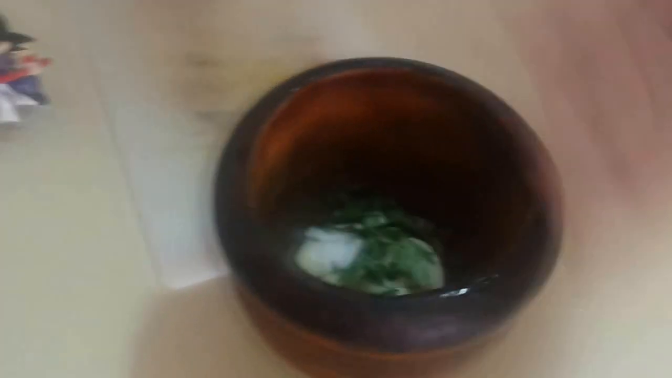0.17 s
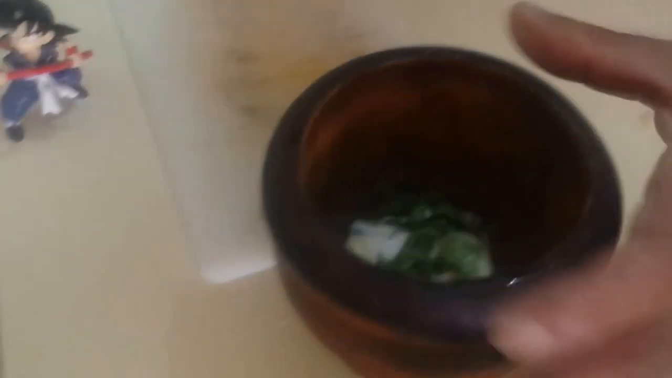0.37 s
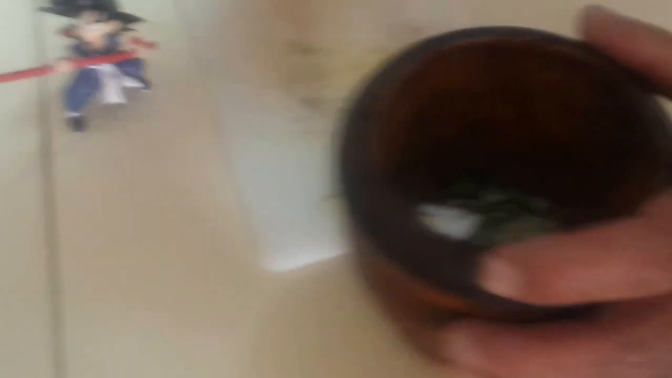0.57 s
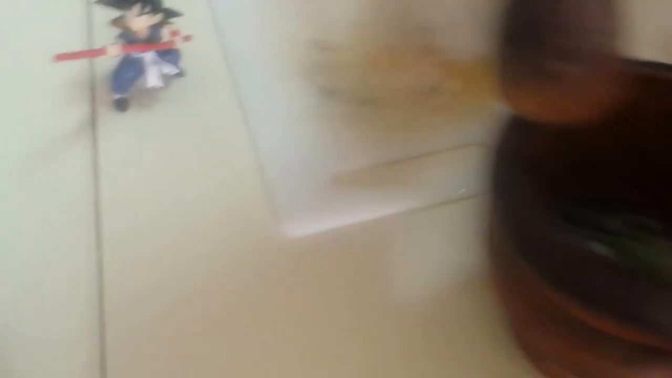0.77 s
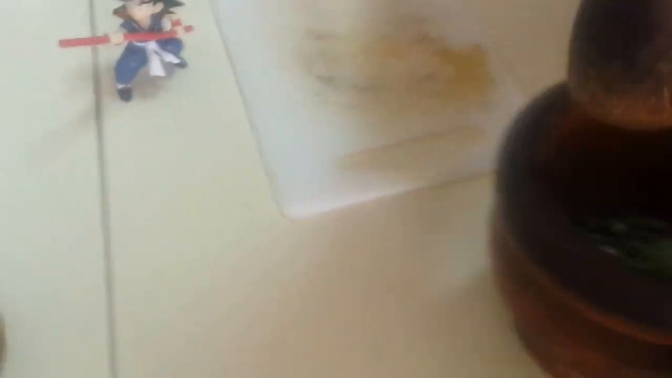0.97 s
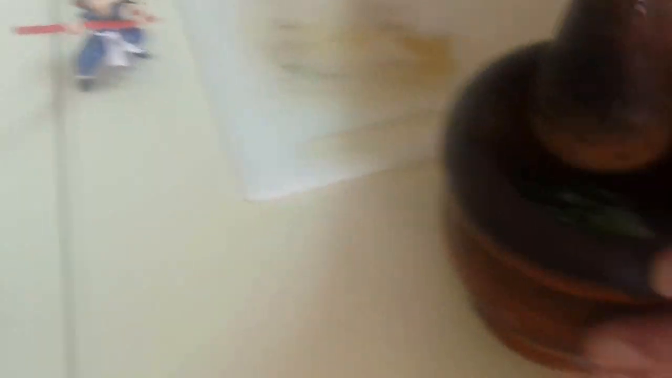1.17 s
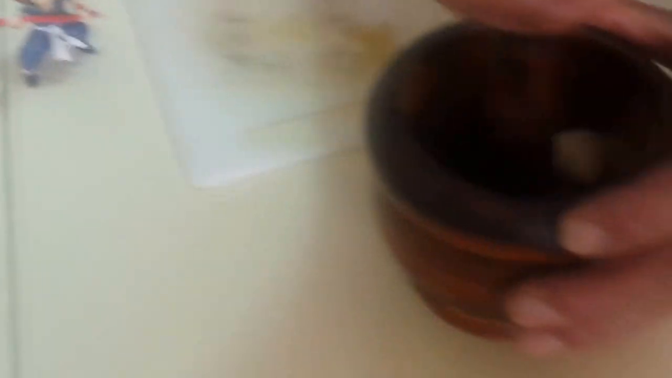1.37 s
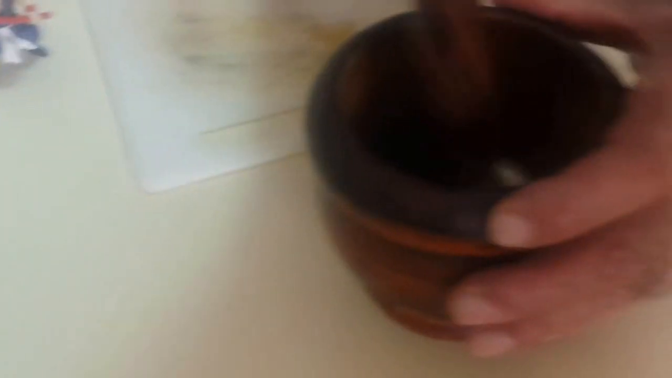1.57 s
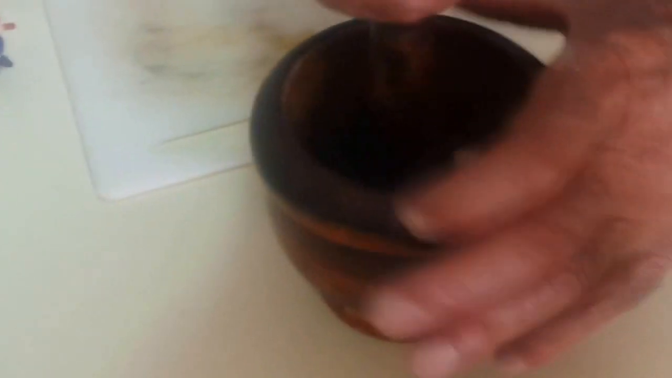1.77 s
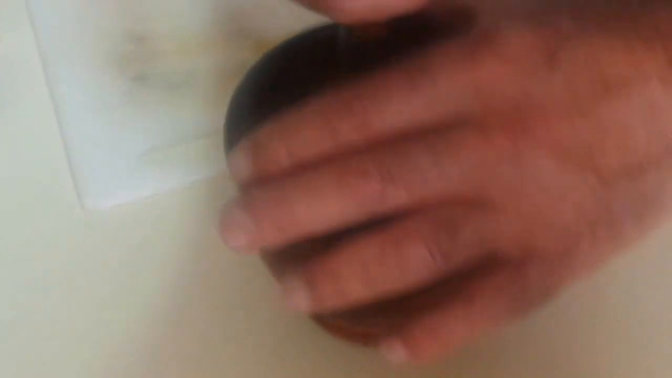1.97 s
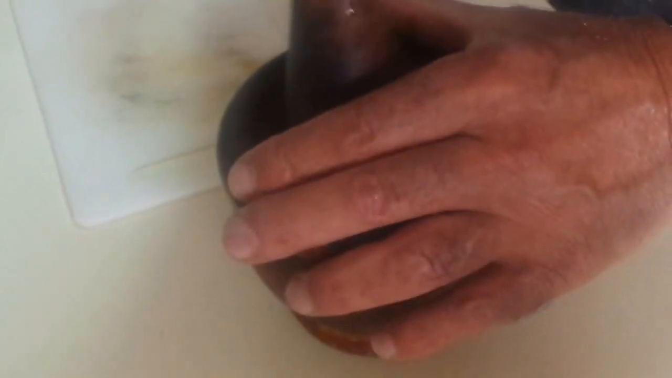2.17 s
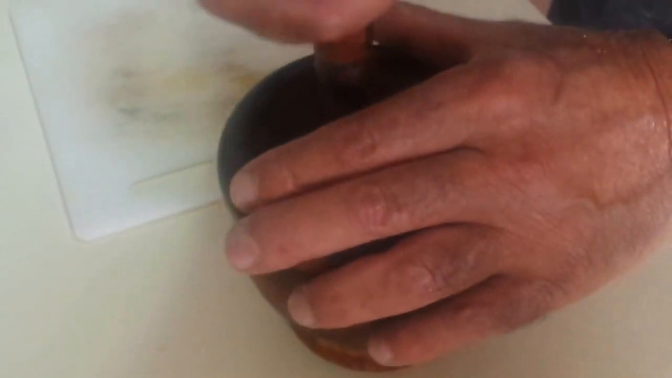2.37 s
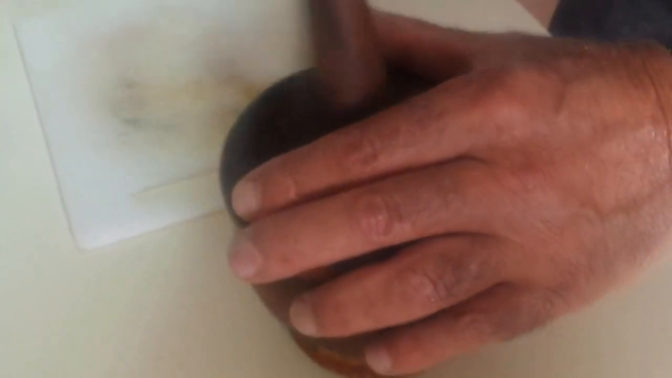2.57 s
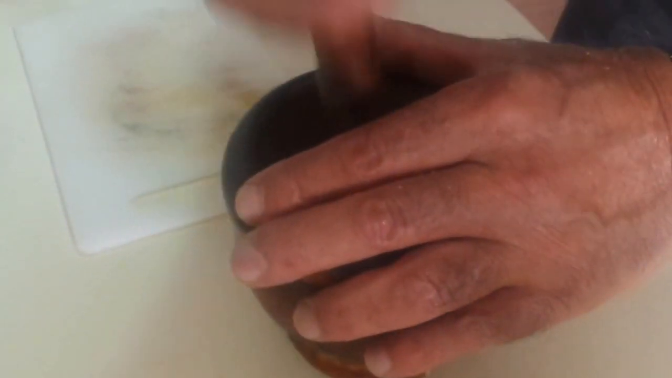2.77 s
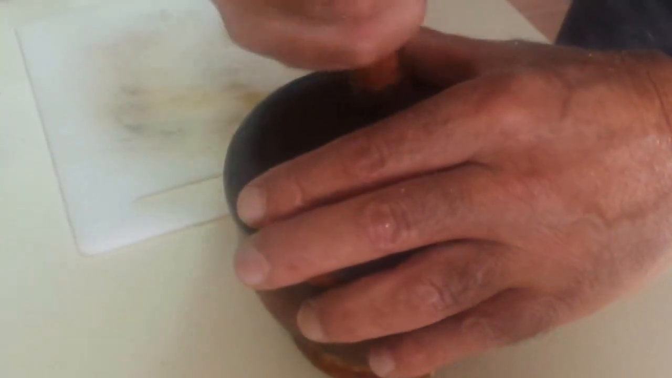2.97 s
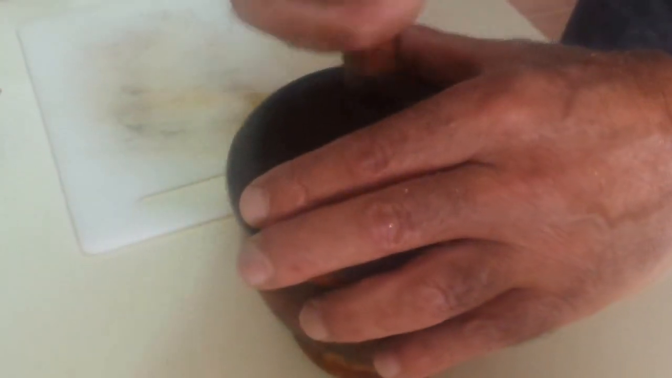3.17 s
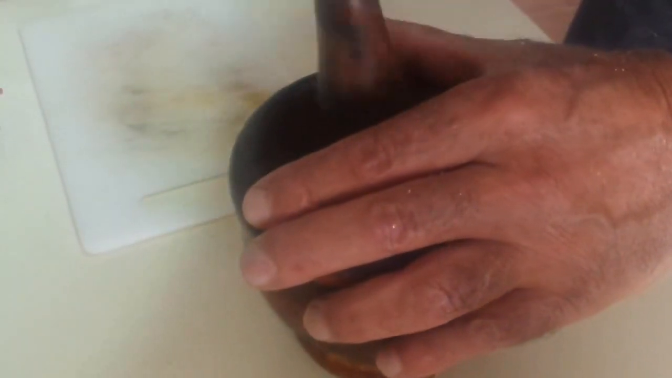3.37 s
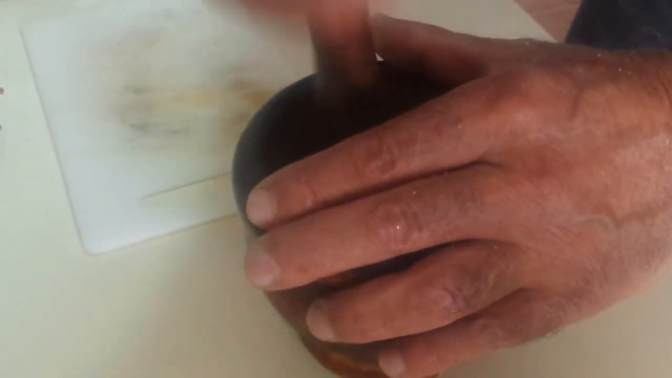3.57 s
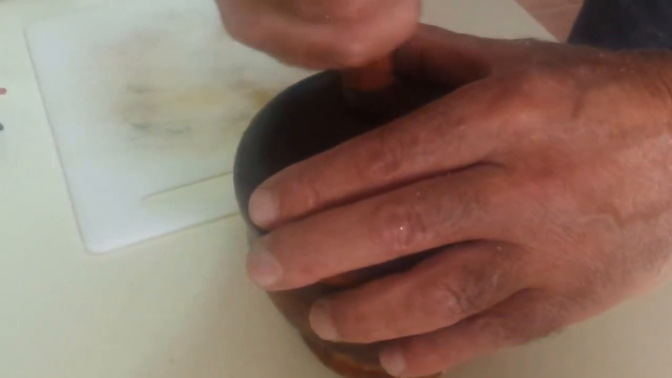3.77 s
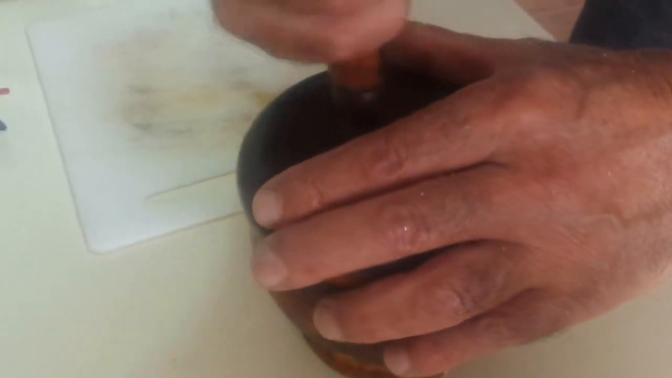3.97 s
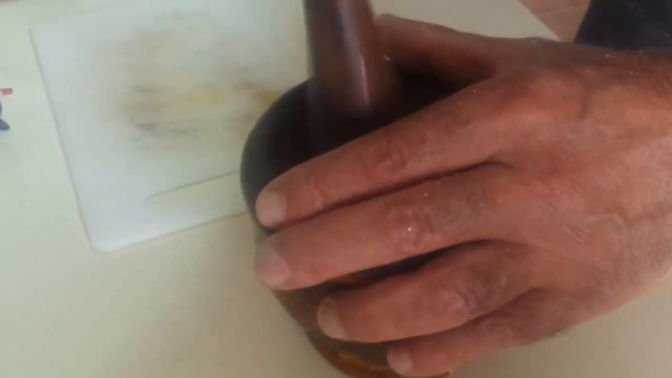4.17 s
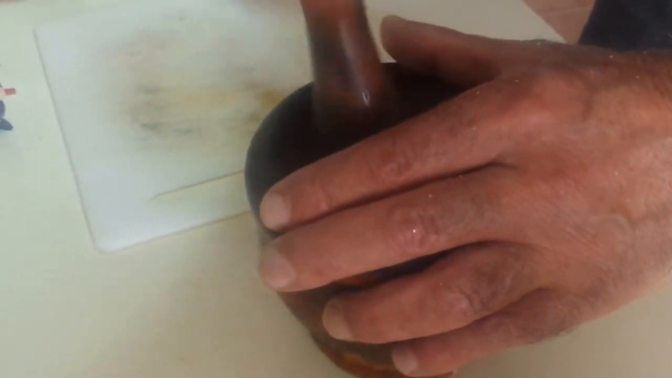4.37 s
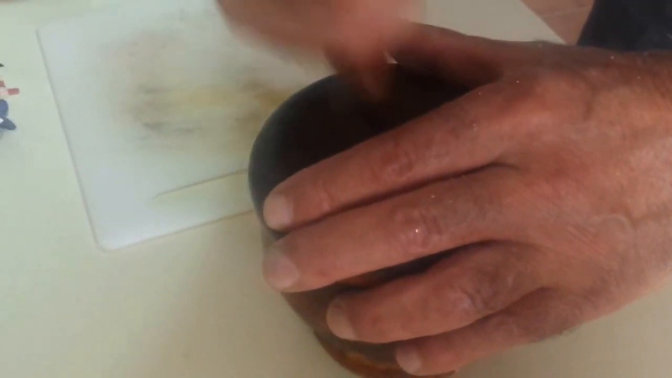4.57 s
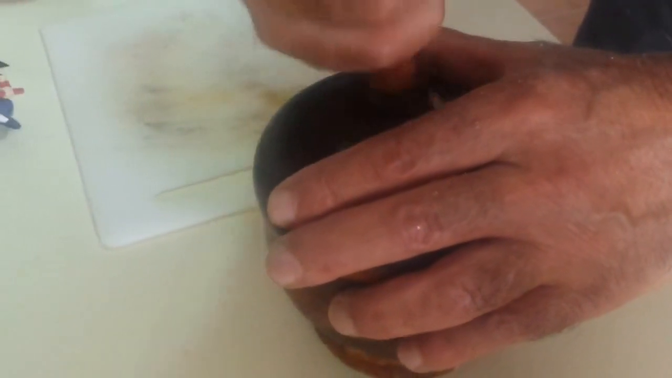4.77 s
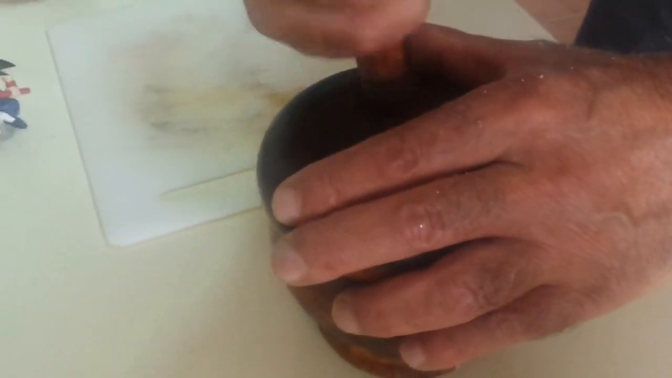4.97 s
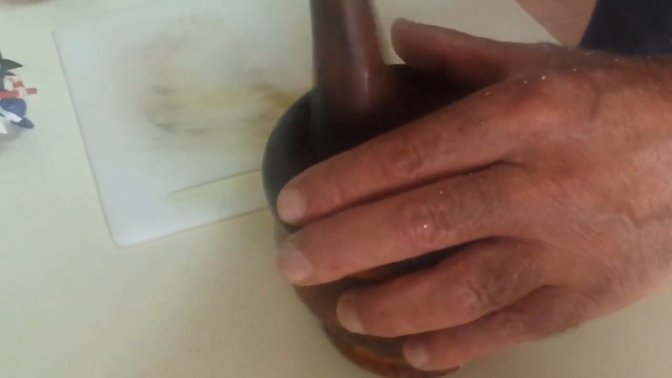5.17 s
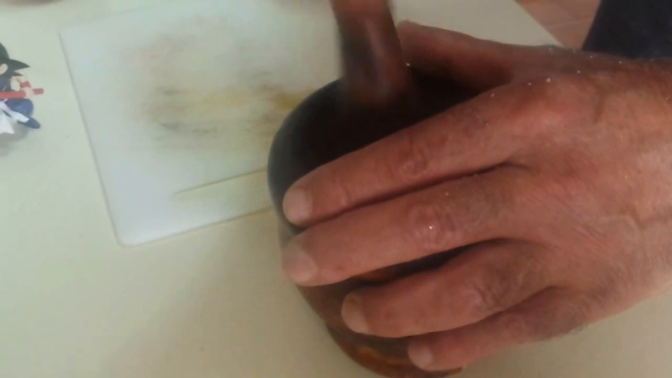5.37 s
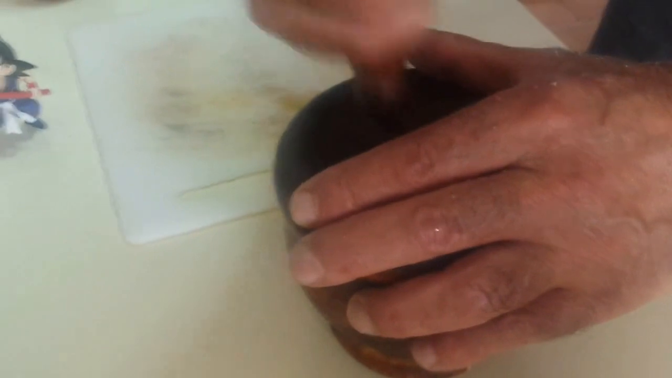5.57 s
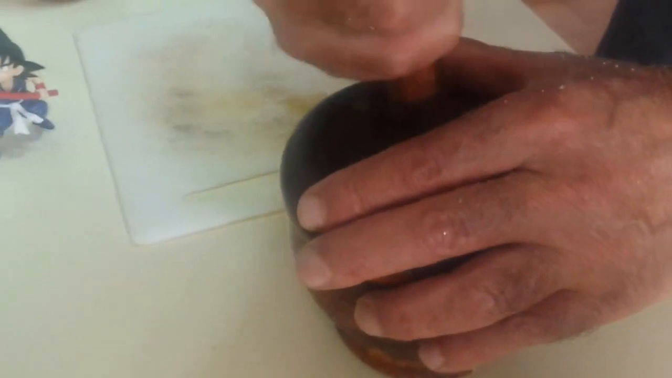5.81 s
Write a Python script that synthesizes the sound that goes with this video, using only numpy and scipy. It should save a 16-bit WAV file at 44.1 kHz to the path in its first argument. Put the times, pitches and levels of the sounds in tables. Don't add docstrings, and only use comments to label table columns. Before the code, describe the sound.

Close to a phone microphone in a hard, lively kitchen, a wooden pestle bumps, then gives one sharp bare knock. After a pause with skin brushing the table, a bright rim strike starts steady pounding, about four blows a second, with dull woody thuds, wet garlic crunches, booming table and faint jar rattle. Soft hum lies underneath.

```python
import sys
import numpy as np
from scipy import signal
from scipy.fft import rfft, irfft
from scipy.io import wavfile
from scipy.ndimage import uniform_filter1d

SR = 44100
rng = np.random.default_rng(int(sys.argv[2]) if len(sys.argv) > 2 else 0)


def pcm_store(signal):
    levels = np.round(np.clip(np.atleast_2d(signal), -1, 1) * 32767)
    wavfile.write(sys.argv[1], SR, levels.astype(np.int16).T)


def elevation(decibels):
    levels = np.asarray(decibels, float)
    return 10 ** (levels / 20)


N = 257544

# (time [s], force [dB], crunch [dB], table boom [dB], squish [dB])
LANDINGS = [(0.0136, -10.5, -26.5, -18.5, -42), (0.1235, -12.5, -31, -25.5, -20),
            (1.25, -26.5, -32, -27, -30), (1.679, -17, -23, -15, -23), (2.249, -16, -22, -13.5, -16.5),
            (2.58, -14.5, -15, -22.5, -17), (2.862, -19.5, -24.5, -20.5, -10.5),
            (3.13, -20, -24, -22, -13.5), (3.398, -24, -25, -16.5, -21), (3.672, -14, -18.5, -10.5, -15),
            (3.927, -12.5, -16.5, -15, -20), (4.183, -13, -21, -10, -18), (4.424, -26, -21, -13, -28),
            (4.679, -15.5, -22, -11.5, -19), (4.93, -26.5, -29, -33.5, -15), (5.451, -12.5, -27, -19, -28),
            (5.705, -11.5, -25.5, -14, -36)]
# (time [s], force [dB], crunch [dB])
DRIVES = [(1.264, -23, -49), (1.327, -29, -35), (1.694, -6, -20.5), (2.296, -18, -55), (2.596, -3.5, -50),
          (2.629, -19, -77), (2.878, -15, -30.5), (3.176, -18.5, -67), (3.415, -9.5, -26),
          (3.719, -6.5, -20), (3.945, -4, -26), (4.202, -5, -24.5), (4.442, -6.5, -24.5),
          (4.695, -7.5, -52)]
# (time [s], force [dB], crunch [dB], rim click over force [dB], push into table [dB])
KNOCKS = [
    (0.7, -8, -26, -3, -26),
    (2.025, -9, -34.5, 4.5, -29),
    (5.178, -20, -16.5, -10, -19.5),
    (5.436, -5.5, -20.5, -43, -33),
    (5.682, -14.5, -17.5, -7, -38),
]
# (frequency [Hz], level [dB])
PASTE_COLOUR = [(150, -19.5), (350, 3.5), (700, 4.5), (1300, -2), (2000, -1.5), (2800, 1.5), (3400, -4),
                (6000, -20.5), (16000, -60.5)]
# (frequency [Hz], level [dB])
BOWL_COLOUR = [(100, -22.5), (300, -0.5), (600, 0.5), (860, 5.5), (1150, -5), (1700, -12), (2500, -7),
               (5000, -24.5), (16000, -139)]
# (frequency [Hz], level [dB])
RIM_COLOUR = [(900, -29.5), (1800, -7), (2300, 9.5), (2900, 11.5), (3700, 3.5), (5000, -11), (8000, -16),
              (16000, -56)]
# (frequency [Hz], level [dB])
GRIT_COLOUR = [(1200, -9.5), (2500, 13), (3600, 13.5), (5000, 9.5), (6500, 4), (9000, -3.5), (12000, -9),
               (16000, -14)]
# (frequency [Hz], level [dB], t60 [s])
TABLE_MODES = [(110.7, -6.5, 0.36), (147, 2.5, 0.23), (155.7, 4.5, 0.44), (190, -23, 1)]
# (frequency [Hz], level [dB], t60 [s])
CUPBOARD_MODES = [(253, -11.5, 0.88), (283.5, -6, 1.3), (322, -6.5, 1.01), (466, -10.5, 0.55),
                  (510, -47, 0.26), (329.4, -7, 1.6)]
# (frequency [Hz], level [dB], t60 [s])
GLASS_MODES = [(3281, -1, .6), (3268, -10, .6), (8215, -12, .28), (10900, -21, .2), (14300, -27, .15)]
# (frequency [Hz], level [dB], t60 [s])
PLATE_MODES = [(2336, -1, .42), (2347, -10, .42), (9173, -30, .3)]
# (frequency [Hz], level [dB], t60 [s])
JAR_MODES = [(2638, -4, .45), (3817, -4, .45), (4064, -9, .4), (4791, -10, .4), (6165, -4, .33),
             (6190, -6, .33)]
# (time [s], level [dB])
GLASS_HITS = [(.015, -17)]
# (time [s], level [dB])
PLATE_HITS = [(.19, -19)]
# (time [s], level [dB])
JAR_HITS = [(2.6, -19), (3.422, -31), (3.7, -21.5), (3.946, -18), (4.197, -25), (4.442, -19.5),
            (4.698, -34), (5.451, -31), (5.707, -21.5)]
# (time [s], level [dB], frequency [Hz], t60 [s])
TOUCHES = [
    (.57, -34, 459, 0.1),
    (.655, -35, 863, 0.14),
    (.675, -35, 836, 0.13),
    (.695, 3, 680, 0.0072),
]
# (loudest time [s], level [dB], swell [s], fade [s])
BRUSHES = [
    (.59, -53.5, 0.04, 0.026),
    (.69, -50, 0.049, .006),
    (1.33, -45.5, 0.097, 0.027),
    (1.6, -58, 0.13, 0.13),
]
# (frequency [Hz], t60 [s])
KITCHEN_T60 = [(80, 0.96), (150, 0.58), (300, 0.65), (700, 0.63), (1800, 0.62), (4800, 0.56), (9000, 0.67),
               (15000, 0.42)]
# (frequency [Hz], level [dB])
WALL_COLOUR = [(40, -62), (100, -0.5), (250, 0.5), (600, 0.84), (1500, 9), (3000, -5), (6000, 4),
               (15000, -1)]
# (frequency [Hz], level [dB per Hz])
AIR_COLOUR = [(30, -18), (100, -5), (200, -5), (320, 0), (600, -6), (1200, -9), (2500, -12), (4000, -17),
              (8000, -22), (16000, -29)]
# (frequency [Hz], correlation [-1 to 1])
PORT_LIKENESS = [(60, 1), (130, 1), (290, 0.81), (640, 0.81), (1410, -0.26), (3100, 0.19), (6820, 0.077),
                 (15000, -0.055)]
# (frequency [Hz], left minus right [dB])
PORT_LEAN = [(60, -1.5), (130, -1.5), (290, 0.5), (640, -1), (1410, 2.5), (3100, 4.5), (6820, 1),
             (15000, -16)]

LIFTED_S, BUMP_THUD_DB = .5, -8
COVER_S = 1.9
COVERED_LAG_S = .006
LAND_THUD_DB, DRIVE_THUD_DB, THUD_PER_DB = -12.5, -13.5, 0.59
LAND_NEAR_DB, DRIVE_NEAR_DB, KNOCK_NEAR_DB = 0, -6.5, -5
LAND_SEND_DB, DRIVE_SEND_DB, KNOCK_SEND_DB = 14, 11.5, 4.5
LAND_RIM_DB = -17
BOOM_LAG_S = 0.01182
SQUISH_LEAD_S, SQUISH_SWELL_S, SQUISH_FADE_S = .02, 0.0022, 0.019
CUPBOARD_DB, CUPBOARD_PER_DB = -12, 0.78
KNOCK_PANEL_DB = -5
GLASS_RISE_S, PLATE_RISE_S, JAR_RISE_S, CUPBOARD_RISE_S = .002, .035, .024, 0.0086
ECHO_BUILD_S = [0.0033, 0.0074, 0.0073, 0.00067]
RINGS_SEND_DB, AIR_DB = -18, -55
PORT_LAG_S = .00012
KNEE_DB, RECOVERY_DB_PER_S = -11, 770.0


def evened(x):
    return x / np.sqrt(np.mean(x ** 2) + 1e-20)


def read(points, hz):
    f, value = np.transpose(points)
    return np.interp(np.log(hz + 1), np.log(f + 1), value)


def add(mix, s, sound):
    part = mix[round(s * SR):][:len(sound)]
    part += sound[:len(part)]


def click(colour_db, size=2048):
    log_gain = read(colour_db, abs(np.fft.fftfreq(size, 1 / SR))) * np.log(10) / 20
    taps = np.fft.ifft(np.exp(np.conj(signal.hilbert(log_gain)))).real
    return taps / abs(taps).max()


def ring(modes, seconds, detune=1, rise=0.00027):
    t = np.arange(round(seconds * SR)) / SR
    hz, db, t60 = np.transpose(modes)[:, :, None]
    waves = elevation(db - 60 * t / t60) * np.sin(2 * np.pi * hz * detune * t)
    return waves.sum(0) * (1 - np.exp(-t / rise))


def blow(knock, knock_db, thud_db, crunch_db):
    t = np.arange(len(knock)) / SR
    push = np.sin(2 * np.pi * 170 * t) * np.exp(-t / 0.0025) * (1 - np.exp(-t / 0.0028))
    wood = elevation(knock_db + 5.5) * knock
    return wood + elevation(thud_db + 11.5) * push + elevation(crunch_db + 8) * click(GRIT_COLOUR)


def chatter(chance, first):
    fade = np.exp(-np.arange(len(chance)) / SR / .004)
    slips = chance * (abs(chance) > 1.3) * .4 * fade
    return np.append(first, slips)


def strike(near, sends, k, s, hit, near_db, send_db, chance, bare=False):
    exposed = bare or s < COVER_S
    contact = chatter(chance, 1 if exposed else .6)
    add(near, s + .0007, elevation(near_db) * np.convolve(hit, contact))
    variant = 3 if exposed else k % 3
    add(sends[variant], s + COVERED_LAG_S * (not exposed), elevation(send_db) * hit)


def squish(db):
    t = np.arange(-SQUISH_LEAD_S, .06, 1 / SR)
    bursts = rng.standard_normal(len(t)) * (rng.random(len(t)) < .3)
    shape = np.exp(-abs(t) / np.where(t < 0, SQUISH_SWELL_S, SQUISH_FADE_S))
    return elevation(db - 10.5) * np.convolve(bursts * shape, click(GRIT_COLOUR)[:300])


def landings(near, sends):
    chances = rng.standard_normal((len(LANDINGS), 400))
    for k, (s, force_db, crunch_db, boom_db, squish_db) in enumerate(LANDINGS):
        thud_db = LAND_THUD_DB + THUD_PER_DB * force_db + BUMP_THUD_DB * (s < LIFTED_S)
        hit = blow(click(PASTE_COLOUR), force_db, thud_db, crunch_db)
        strike(near, sends, k, s, hit, LAND_NEAR_DB, LAND_SEND_DB, chances[k])
        add(near, s, elevation(force_db + LAND_RIM_DB) * click(RIM_COLOUR))
        detune = 1 + 0.0015 * chances[k, :len(TABLE_MODES), None]
        add(near, s + BOOM_LAG_S, elevation(boom_db) * ring(TABLE_MODES, .8, detune, rise=0.036))
        if s > LIFTED_S:
            add(near, s - SQUISH_LEAD_S, squish(squish_db))


def drives(near, sends):
    chances = rng.standard_normal((len(DRIVES), 400))
    for k, (s, force_db, crunch_db) in enumerate(DRIVES):
        thud_db = DRIVE_THUD_DB + THUD_PER_DB * force_db
        hit = blow(click(PASTE_COLOUR), force_db, thud_db, crunch_db)
        strike(near, sends, k, s, hit, DRIVE_NEAR_DB, DRIVE_SEND_DB, chances[k])


def bare_knocks(near, sends):
    chances = rng.standard_normal((len(KNOCKS), 400))
    for k, (s, force_db, crunch_db, rim_db, push_db) in enumerate(KNOCKS):
        hit = blow(-click(BOWL_COLOUR), force_db, push_db, crunch_db)
        hit += elevation(force_db + rim_db) * click(RIM_COLOUR)
        strike(near, sends, k, s, hit, KNOCK_NEAR_DB, KNOCK_SEND_DB, chances[k], bare=True)


def crockery():
    out = np.zeros(N)
    panel_hits = [(s, CUPBOARD_DB + CUPBOARD_PER_DB * boom_db) for s, _, _, boom_db, _ in LANDINGS]
    panel_hits += [(s, push_db + KNOCK_PANEL_DB) for s, _, _, _, push_db in KNOCKS]
    bodies = ((GLASS_MODES, GLASS_HITS, GLASS_RISE_S),
              (PLATE_MODES, PLATE_HITS, PLATE_RISE_S),
              (JAR_MODES, JAR_HITS, JAR_RISE_S),
              (CUPBOARD_MODES, panel_hits, CUPBOARD_RISE_S))
    for modes, hits, rise in bodies:
        for s, db in hits:
            add(out, s, elevation(db) * ring(modes, .8, rng.normal(1, .002), rise))
    for s, db, hz, t60 in TOUCHES:
        add(out, s, ring([(hz, db, t60)], .5, rise=0.0068))
    return out


def brush():
    t = np.arange(N) / SR
    roughness = evened(uniform_filter1d(rng.standard_normal(N), 90))
    grain = rng.standard_normal(N) * elevation(1.9 * roughness)
    hiss = evened(signal.lfilter(*signal.butter(2, [2000, 6500], "band", fs=SR), grain))
    strokes = np.zeros(N)
    for s, db, swell, fade in BRUSHES:
        strokes += elevation(db) * np.exp(-((t - s) / np.where(t < s, swell, fade)) ** 2)
    return hiss * strokes


def diffuse(a, b, colour_db, t60):
    hz, t, z = signal.stft([a, b], SR, nperseg=512)
    same = np.clip(read(PORT_LIKENESS, hz), -1, 1)[:, None]
    pair = np.array([z[0], same * z[0] + np.sqrt(1 - same ** 2) * z[1]])
    level_db = read(colour_db, hz)[:, None] - 60 * t / read(t60, hz)[:, None]
    return signal.istft(pair * elevation(level_db), SR, nperseg=512)[1]


def echo(build_s):
    t = np.arange(SR) / SR
    taps = rng.standard_normal((2, SR)) * (rng.random((2, SR)) < .18)
    taps *= 1 - np.exp(-np.maximum(t - .004, 0) / build_s)
    clumps = elevation(0.98 * evened(uniform_filter1d(rng.standard_normal(SR), size=500)))
    tail = diffuse(*(taps * clumps), WALL_COLOUR, KITCHEN_T60)
    return tail / np.linalg.norm(tail[0])


def room_hum():
    endless = [(1, 1e9), (2, 1e9)]
    hum = diffuse(*rng.standard_normal((2, N)), AIR_COLOUR, endless)[:, :N]
    return elevation(AIR_DB) * evened(hum)


def scene():
    rings = crockery()
    near, sends = rings.copy(), np.zeros((4, N))
    landings(near, sends)
    drives(near, sends)
    bare_knocks(near, sends)
    sends[3] += elevation(RINGS_SEND_DB) * rings
    far = np.zeros((2, N))
    for send, build_s in zip(sends, ECHO_BUILD_S):
        far += signal.fftconvolve(send[None], echo(build_s), axes=1)[:, :N]
    ports = np.array([np.roll(near, round(PORT_LAG_S * SR)), near])
    return ports + far + brush() + room_hum()


def top_cut(x):
    return signal.sosfilt(signal.butter(12, 16500, fs=SR, output="sos"), x)


def record(dry):
    hz = np.fft.rfftfreq(N, 1 / SR)
    lean_db = read(PORT_LEAN, hz) * np.array([[.5], [-.5]])
    ports = irfft(rfft(dry) * elevation(lean_db), N)
    ports = signal.lfilter(*signal.butter(2, 40, "high", fs=SR), ports)
    ports = signal.oaconvolve(ports, signal.firwin(255, 15250, fs=SR)[None], "same")
    power = signal.lfilter([.012], [1, .012 - 1], (ports ** 2).max(0))
    fall_db = np.arange(N) * RECOVERY_DB_PER_S / SR
    held_db = np.maximum.accumulate(10 * np.log10(power + 1e-12) + fall_db) - fall_db
    duck_db = uniform_filter1d(np.maximum(held_db - KNEE_DB, 0), size=60, origin=29)
    held = ports / elevation(.8 * duck_db)
    mix = held / (1 + held ** 4) ** .25
    return top_cut(mix)


dry = scene()
out = record(dry)
pcm_store(out)
```